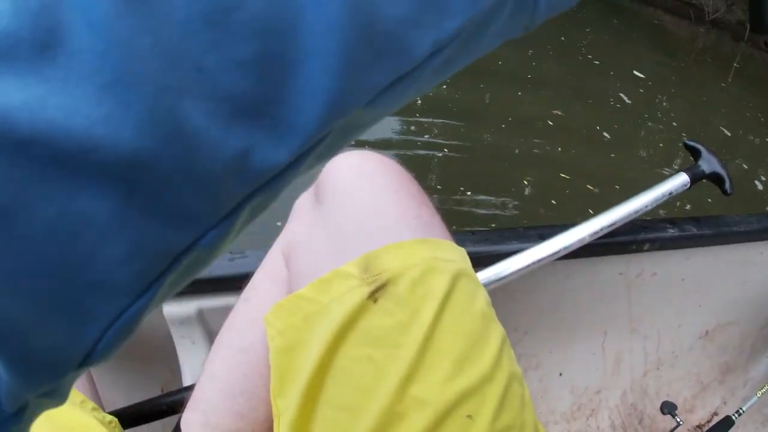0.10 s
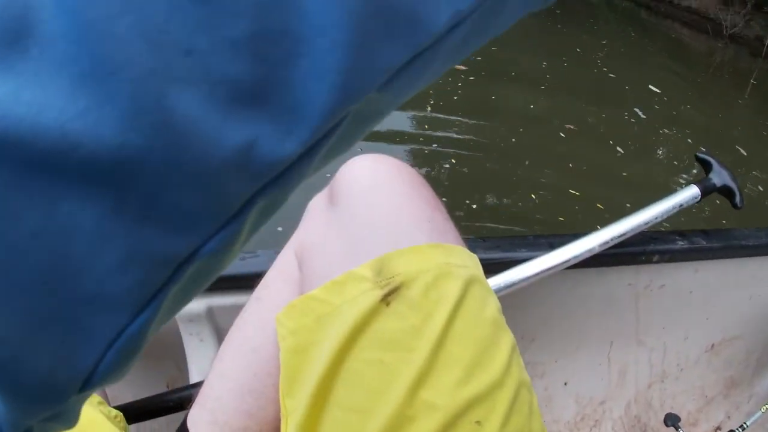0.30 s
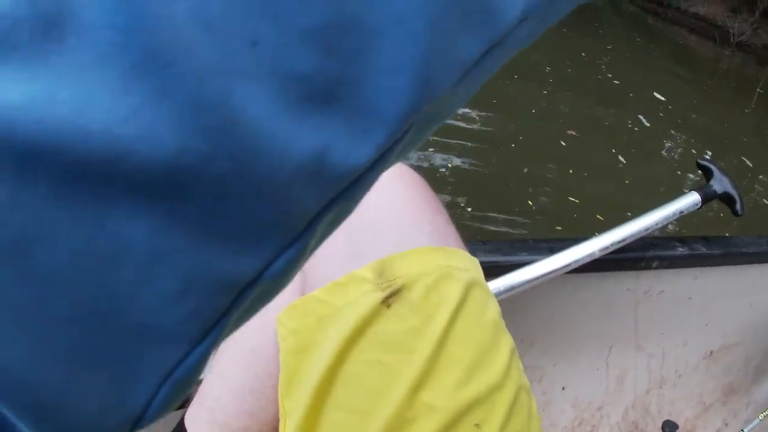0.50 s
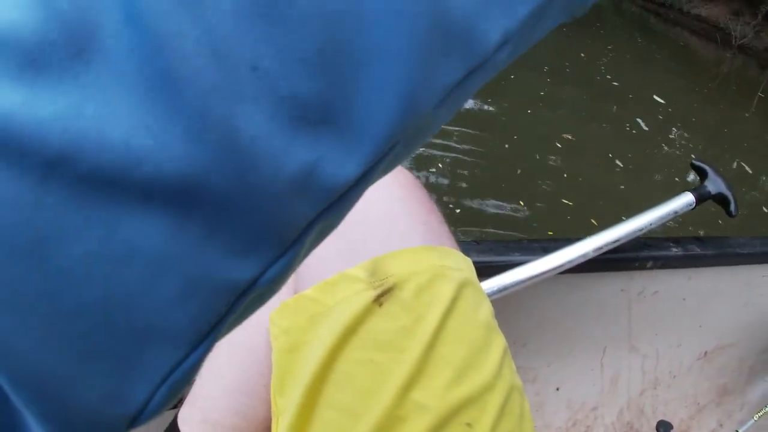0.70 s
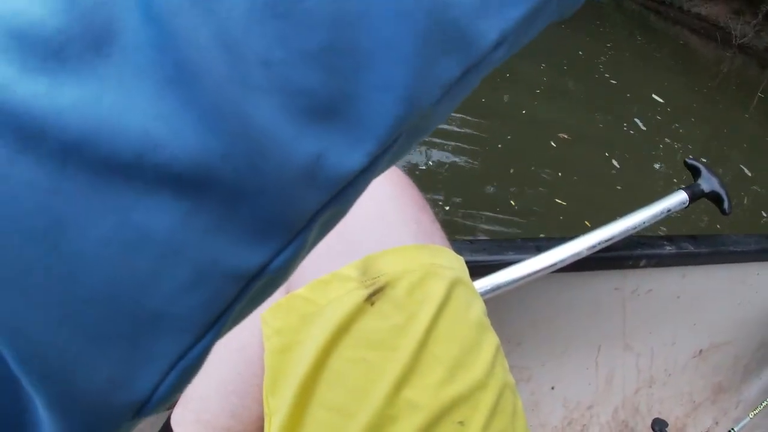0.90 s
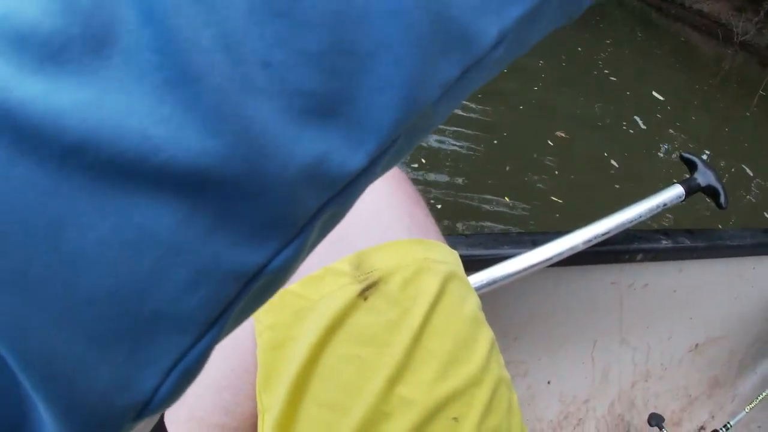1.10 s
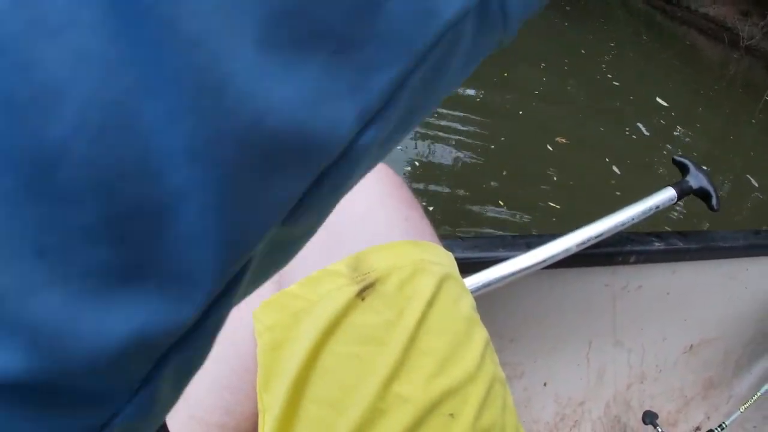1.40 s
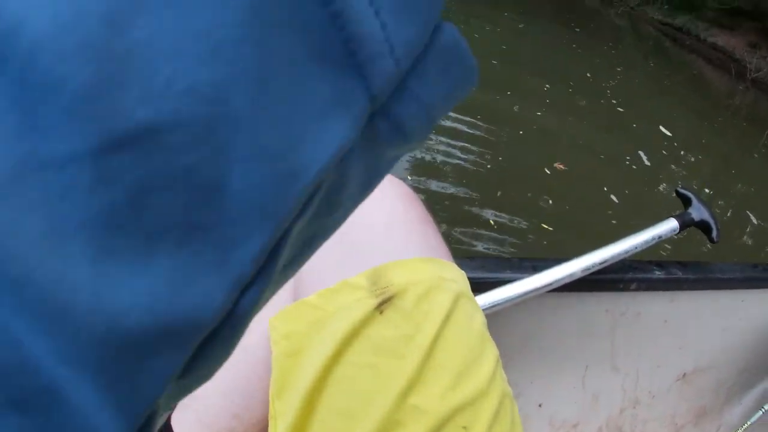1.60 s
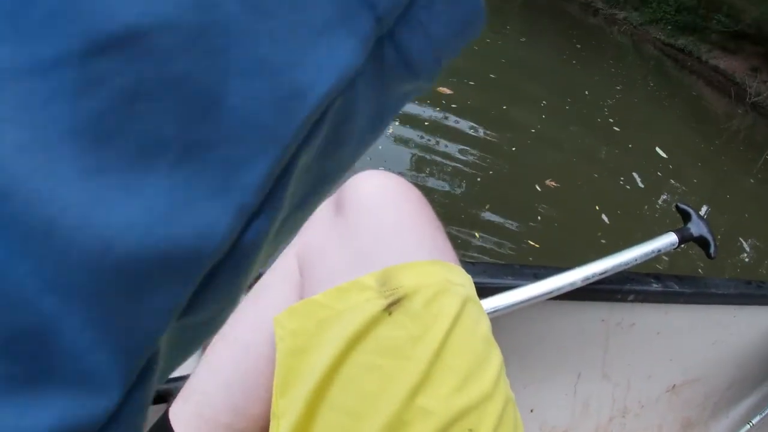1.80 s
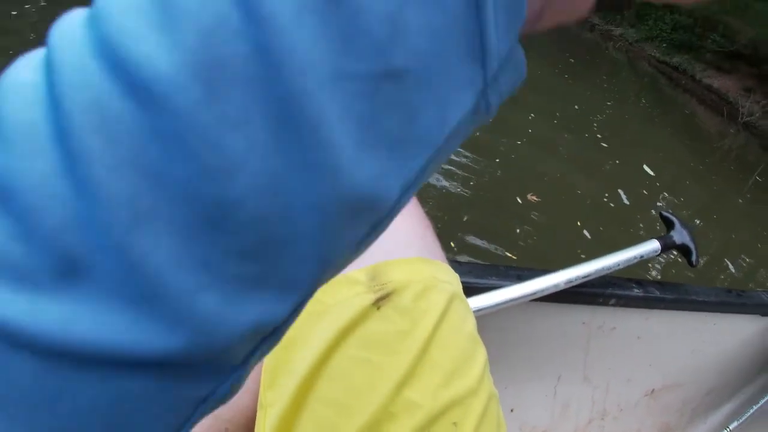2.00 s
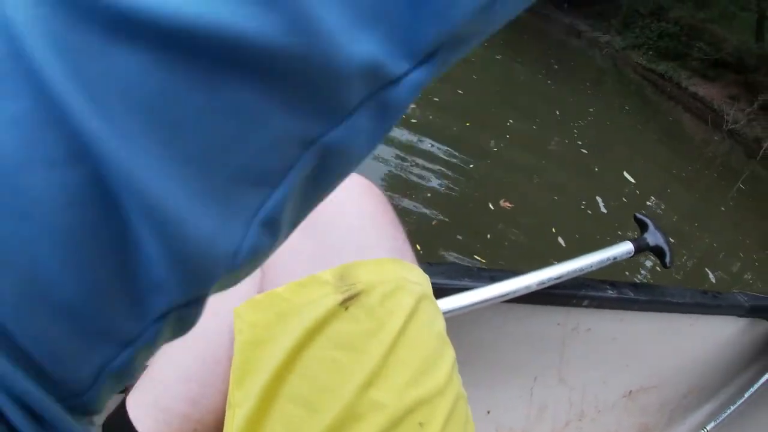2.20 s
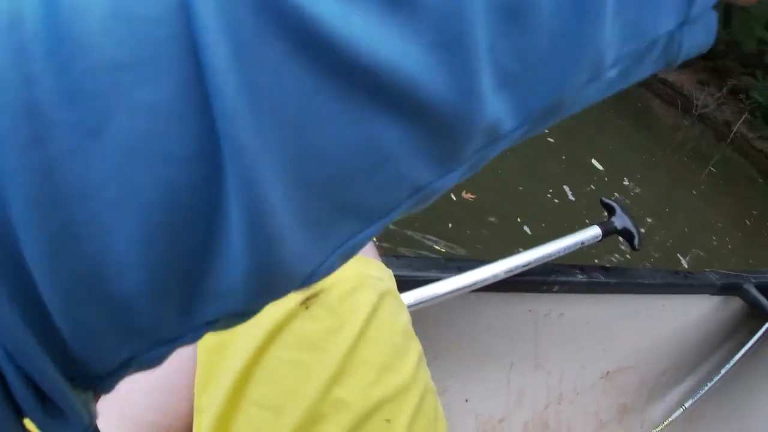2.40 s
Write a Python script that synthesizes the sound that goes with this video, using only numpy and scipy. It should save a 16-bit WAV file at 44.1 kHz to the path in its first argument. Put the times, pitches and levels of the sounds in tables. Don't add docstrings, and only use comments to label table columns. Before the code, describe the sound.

Hollow knocks and dull bumps on a canoe hull, close up, then a fishing reel's sharp ticks in two short turns, a bail snap, and fabric rustling beside the microphone, over steady insect hiss on a creek.

```python
import sys
import numpy as np
from scipy import signal
from scipy.fft import rfft, irfft
from scipy.io import wavfile
from scipy.ndimage import uniform_filter1d

SR = 44100
rng = np.random.default_rng(int(sys.argv[2]) if len(sys.argv) > 2 else 0)


def natural_amplitude(level_db):
    exponent = np.asarray(level_db, float) / 20
    return 10 ** exponent


def persist_wave(psi):
    counts = np.round(np.clip(psi, -1, 1) * 32767).astype(np.int16)
    wavfile.write(sys.argv[1], SR, np.atleast_2d(counts).T)


N = 114660

# (pitch [Hz], level [dB], t60 [s])
BOW_MODES = [(91, -2.5, 0.23), (117.3, 2.5, 0.21), (155.7, 2, 0.42), (260, -8.5, 0.19), (360, -8, 0.19),
             (403, 3, 0.16), (505, 7.5, 0.16), (553, 4, 0.095), (557.6, -0.5, 0.048), (782, 1, 0.14),
             (1093, -5.5, .11), (1200, -4, 0.043), (1394, -15, 0.19)]
RIB_MODES = [(163.3, -6, 0.6), (260, -14, 0.32), (340, -9, 0.25), (480, -11, 0.31), (543, -8, 0.16),
             (730, -17, 0.24), (815, -10, 0.12), (1017, -6, 0.12), (1240, -27, 0.11), (1594, -21, 0.3),
             (1890, -10.5, 0.044)]
SEAT_MODES = [(169.5, 2.5, 0.28), (262.5, -5, 0.3), (391, -6.5, 0.16), (579, -2.5, 0.15), (800, -30, .11),
              (987, -7.5, 0.097), (1620, -12, 0.033)]
KEEL_MODES = [(156.6, -3.5, 0.46), (235.4, -10.5, 0.34), (285.5, -14, 0.43), (373.4, -4.5, 0.35),
              (433.3, -1, 0.22), (508, -13, 0.12), (698, -4, 0.097), (945, -12, 0.04), (1131, -10, 0.08)]
FLOOR_MODES = [(47, 1, 0.71), (89, 4, 0.3), (172, 7, 0.32), (246, 1.5, 0.32), (310.4, 1, 0.39),
               (500, -27, 0.078), (723, -11, 0.066)]
KNOCK_TIMES = [
    .251,
    .408,
    .5105,
    .7805,
    1.524,
]
# (strength [dB], hardness [dB per octave], travel time at 100 Hz [s])
KNOCKS = [(-28, 0.5, 0.037), (-30.5, 1.5, 0.016), (-36, 1.5, 0.026), (-35, 0.5, 0.026),
          (-50.5, -0.5, 0.049)]
BUMP_TIMES = [.2425, .673, .808, .904, .951, .185, .105, .717]
# (strength [dB], hardness [dB per octave], travel time at 100 Hz [s])
BUMPS = [(-28, 4, 0.0072), (-52.5, 4.5, 0.0062), (-37, -3, 0.014), (-48, -2.5, 0.015), (-56.5, -3, 0.013),
         (-63, 2, .01), (-58, -2, 0.011), (-51, -6, 0.0078)]
# (pitch [Hz], level [dB])
SMALL_MODES = [(40, -23.5), (90, -21), (220, -5.5), (400, -7.5), (1200, -14.5), (2300, -21), (4000, -27),
               (7000, -48.5)]
# (time [s], level [dB])
SHUFFLE = [(0, -70), (.09, -66), (.13, -60.5), (.23, -46), (.62, -58), (.66, -60.5), (.7, -47.5),
           (.97, -57), (1.04, -63), (1.4, -72.5), (1.52, -57.5), (1.63, -62), (1.85, -73), (2.08, -63.5),
           (2.25, -68), (2.5, -51)]

# (time [s], peak [dB], ring pitch [Hz], brightness [dB], body pitch [Hz])
PAWL_TICKS = [
    (0.6732, -12, 7350, 3, 2400),
    (0.7317, -14, 7230, 2, 2470),
    (0.7836, -12, 6930, -2, 2340),
    (0.8219, -11.5, 6945, -10, 2250),
    (0.8564, -13.5, 6500, -1.5, 2050),
    (0.887, -13, 7040, -3, 2120),
    (0.9585, -13.5, 6930, 1, 2070),
    (1.0006, -12.5, 6810, 0, 2290),
    (1.0251, -13.5, 6990, 0, 2150),
    (1.0556, -13.5, 6880, 3, 2250),
]
# (share of ring pitch, width [Hz], level [dB])
PAWL_MAIN = [(0.949, 303, -0.5), (1.011, 260, 3), (1.07, 335, -2)]
# (pitch [Hz], width [Hz], level [dB])
PAWL_RING = [(1700, 230, -31), (3280, 260, -22.5), (3900, 350, -18), (4630, 400, -26.5), (5380, 390, -18.5),
             (8910, 310, -11)]
# (pitch [Hz], width [Hz], level [dB])
PAWL_TOP = [(9570, 370, -14.5), (10630, 310, -8), (11960, 340, -12.5), (12570, 660, -13), (13800, 720, -19),
            (15000, 670, -24.5), (16000, 450, -36)]
# (time [s], level [dB])
BAIL_SNAP = [
    (1.2, -31),
    (1.2032, -10),
    (1.2086, -28.5),
]
# (time [s], level [dB])
BAIL_TAPS = [
    (1.125, -35.5),
    (1.138, -35),
    (1.316, -50),
]
# (pitch [Hz], width [Hz], level [dB])
BAIL_RING = [(2084, 286, 2), (3540, 63, -28), (4380, 550, 3.5), (5930, 530, -7.5), (7350, 520, -1.5),
             (9200, 580, -16.5), (11040, 540, -20.5), (12800, 800, -30), (14400, 800, -36)]

# (time [s], sleeve effort [dB], strap rub [dB], seat creak [dB], air on the microphone [dB])
MOVE = [(0, -83, -82, -93, -57), (.3, -70, -102, -103, -59), (1.2, -67.5, -69, -81, -67.5),
        (1.45, -66.5, -95, -66, -78), (1.6, -65, -88, -69.5, -52), (1.73, -67, -59, -55, -60),
        (1.82, -105, -101, -82, -86), (1.97, -83, -77, -63, -64), (2.03, -56, -71, -62, -54),
        (2.13, -56.5, -48.5, -64.5, -51), (2.27, -60, -51.5, -87, -42), (2.335, -53, -66, -44, -48),
        (2.38, -57, -61, -81, -56), (2.47, -55.5, -62, -50, -49), (2.55, -53, -49, -71, -53.5)]
# (pitch [Hz], level [dB])
SLEEVE_COLOUR = [(300, -20.5), (1000, 7.5), (3000, 6.5), (7000, -11.5), (9000, -1), (12000, -23),
                 (15100, -30), (15500, -59)]
# (time [s], level [dB], centre [Hz])
SNAPS = [(1.992, -50, 8000), (1.997, -44.5, 9000), (2.002, -43.5, 8000), (2.007, -50, 10000),
         (2.026, -55, 9000), (2.085, -52, 8000), (2.126, -52, 8000), (2.146, -50, 9000),
         (2.156, -47, 10500), (2.173, -56, 11000), (2.1935, -42, 11000), (2.217, -41.5, 10000),
         (2.2363, -48.5, 9500), (2.302, -43, 9500), (2.329, -49, 11000), (2.362, -51, 10000),
         (2.4074, -62, 13500), (2.451, -67, 9000), (2.512, -66, 11000), (2.527, -54, 12000),
         (2.539, -48.5, 9500), (2.565, -51, 10000)]
# (pitch [Hz], level [dB])
SNAP_COLOUR = [(2000, -13), (5000, 10.5), (9000, 1), (13000, -15), (15200, -21.5), (15700, -45)]
# (time [s], level [dB], pitch [Hz])
PINGS = [
    (2.219, -39, 5050),
    (2.003, -42, 2700),
    (.474, -54, 1950),
]

# (pitch [Hz], level [dB])
CREEK_COLOUR = [(30, -25), (100, -50.5), (160, -4.5), (500, -46), (790, -23.5), (1600, -32), (2600, -12),
                (3700, -9.5)]
# (pitch [Hz], level [dB])
INSECT_COLOUR = [(5300, -12.5), (6300, -5), (6700, -1.5), (7000, 1.5), (7350, -8), (7700, -17),
                 (9000, -27.5), (11000, -35.5), (12500, -48), (15000, -52), (15600, -72)]
# (time [s], level [dB])
BANK_LEVEL = [
    (0.0, -47.5),
    (1.19, -48),
    (2.6, -43.5),
]
# (pitch [Hz], level [dB])
LEFT_LEAN = [(6000, -47), (10500, -24), (11800, -15), (14000, -9.5), (16500, -14)]

SMALL_T60_S, SMALL_SLOPE = 0.33, 0.43
RISE_SHARE = 0.89
CLUSTER_SHARE = 0.0524
SOFT_HZ = 150
BODY_WIDTH_HZ, BODY_DB = 215, -15.5
WANDER_SHARE, WANDER_DB = 0.02, 3.0
SECOND_S, SECOND_DB = 0.0017, -6
BOUNCE_S, BOUNCE_DB = 0.0054, -17.5
CHATTER_DB, CHATTER_T60_S = -22, 0.032
STRAP_HZ, STRAP_WIDTH_HZ = 2330, 330
CREAK_HZ, CREAK_WIDTH_HZ = 1266, 110
AIR_HZ = 43.3
CRINKLES_PER_S, CRINKLE_DB = 270, -7
SNAP_T60_S, SNAP_RISE_S, SNAP_DB, SNAP_OCTAVES = 0.018, 0.0005, 9.5, 0.7
SIDE_DB, EDGE_HZ = -97, 16800


def hull():
    rumble = noise(lambda f: read(SMALL_MODES, f) - 3 * np.log2(1 + f / 300), 3.0, 1.5)
    out = curve(SHUFFLE, col=1) * rumble
    struck = [BOW_MODES, RIB_MODES, SEAT_MODES, KEEL_MODES, FLOOR_MODES] + [KEEL_MODES] * len(BUMPS)
    for s, strike, modes in zip(KNOCK_TIMES + BUMP_TIMES, KNOCKS + BUMPS, struck):
        add(out, s, knock(*strike, modes))
    return out


def knock(db, hard_db, travel, modes):
    t = np.arange(SR // 2)[:, None] / SR
    draw = rng.random((90, 3))
    small = np.geomspace(40, 7000, 90) * (0.97 + 0.06 * draw[:, 0])
    small_level = read(SMALL_MODES, small) + 10 * np.log10(0.05 + draw[:, 1])
    small_t60 = SMALL_T60_S * (100 / small) ** SMALL_SLOPE
    named, named_level, named_t60 = np.repeat(modes, 3, axis=0).T
    offset = np.tile([0, -1, 1], len(modes)) * (0.5 + rng.random(len(named)))
    named = named * (1 + CLUSTER_SHARE * offset)
    named_level = named_level - 4 * rng.random(len(named))

    hz = np.r_[named, small]
    level = np.r_[named_level, small_level] + hard_db * np.log2(np.maximum(hz, SOFT_HZ) / 300)
    t60 = np.r_[named_t60, small_t60]
    lag = abs(travel) * np.sqrt(100 / hz)
    rise = np.clip((t - (1 - RISE_SHARE) * lag) / (RISE_SHARE * lag + 1e-4), 0, 1)
    decay = natural_amplitude(db + level - 60 * np.maximum(t - lag, 0) / t60)
    envelope = np.sin(np.pi / 2 * rise) ** 2 * decay
    phase = np.r_[rng.random(len(named)), draw[:, 2]]
    return (envelope * np.sin(2 * np.pi * (hz * t + phase))).sum(1)


def reel():
    out = np.zeros(N)
    t = np.arange(1500) / SR
    for s, db, hz, bright_db, body_hz in PAWL_TICKS:
        peaks = [(hz * share, w, d) for share, w, d in PAWL_MAIN] + PAWL_RING
        peaks += [(f, w, d + bright_db) for f, w, d in PAWL_TOP]
        peaks += [(body_hz, BODY_WIDTH_HZ, BODY_DB)]
        tick = ring(peaks, 0.00035)
        contacts = rng.standard_normal(1500) * (rng.random(1500) < 0.1)
        chatter = natural_amplitude(CHATTER_DB - 60 * t / CHATTER_T60_S) * contacts
        add(out, s, natural_amplitude(db) * (tick + signal.fftconvolve(chatter, tick)[:1500]))
        second = s + SECOND_S * (0.52 + 0.4 * rng.random())
        add(out, second, natural_amplitude(db + SECOND_DB) * ring(peaks, 0.00034))
        bounce = s + BOUNCE_S * (1 + 0.036 * rng.standard_normal())
        add(out, bounce, natural_amplitude(db + BOUNCE_DB) * ring(peaks, 0.0012))
    for s, db in BAIL_SNAP:
        add(out, s, natural_amplitude(db) * ring(BAIL_RING, 0.00074))
    for s, db in BAIL_TAPS:
        add(out, s, natural_amplitude(db) * ring(BAIL_RING[:1], 0.00072))
    return out


def ring(peaks, rise_s):
    t = np.arange(1500)[:, None] / SR
    hz, width, level = np.transpose(peaks)
    draw = rng.standard_normal((len(hz), 3))
    hz = hz * (1 + WANDER_SHARE * draw[:, 0])
    tone = np.sin(2 * np.pi * (hz * t + draw[:, 2])) * np.exp(-np.pi * width * t)
    onset = 1 - np.exp(-(t / rise_s) ** 2)
    tick = (natural_amplitude(level + WANDER_DB * draw[:, 1]) * tone * onset).sum(1)
    return tick / abs(tick).max()


def sleeve():
    effort = curve(MOVE, col=1)
    fabric = effort * noise(lambda f: read(SLEEVE_COLOUR, f), 1.2, 0.97)
    strap = curve(MOVE, col=2) * band(STRAP_HZ, STRAP_WIDTH_HZ, 3.9)
    creak = curve(MOVE, col=3) * band(CREAK_HZ, CREAK_WIDTH_HZ, 1.1)
    return fabric + strap + creak + crinkles(effort) + snaps() + curve(MOVE, col=4) * air()


def crinkles(effort):
    strength = natural_amplitude(CRINKLE_DB + 3.0 * np.minimum(rng.exponential(1, N), 4))
    kicks = effort * strength * (rng.random(N) < CRINKLES_PER_S / SR)
    decay = natural_amplitude(-60 / (SNAP_T60_S * SR))
    bursts = signal.lfilter([1], [1, -decay], kicks) * rng.standard_normal(N)
    return colour(bursts, lambda f: read(SNAP_COLOUR, f))


def snaps():
    out = np.zeros(N)
    t = np.arange(1024) / SR
    f = np.fft.rfftfreq(1024, 1 / SR) + 1
    for s, db, hz in SNAPS:
        tint = natural_amplitude(read(SNAP_COLOUR, f) - 3.2 * (np.log2(f / hz) / SNAP_OCTAVES) ** 2)
        puff = irfft(rfft(rng.standard_normal(1024)) * tint)
        onset = 1 - np.exp(-(t / SNAP_RISE_S) ** 2)
        add(out, s - SNAP_RISE_S, natural_amplitude(db + SNAP_DB - 60 * t / SNAP_T60_S) * onset * puff)
    for s, db, hz in PINGS:
        add(out, s, natural_amplitude(db) * ring([(hz, 90, 0)], 0.00072))
    return out


def air():
    def tilt(f):
        return -10 * np.log10(1 + (f / AIR_HZ) ** 12) - 40 * (f < 6) - 5 * np.log2(f + 1)
    return evened(colour(rng.standard_normal(N), tilt))


def banks():
    return curve(BANK_LEVEL, col=1) * noise(lambda f: read(CREEK_COLOUR + INSECT_COLOUR, f), 0.56, 0.95)


def noise(db_of, patch_db, throb_db):
    frames, hz = N // 128 + 6, np.fft.rfftfreq(512, 1 / SR)
    real, imag, patch = rng.standard_normal((frames, 257, 3)).T
    patch = uniform_filter1d(patch, size=7, axis=0)
    patch = evened(uniform_filter1d(patch, size=20, axis=1))
    throb = evened(uniform_filter1d(rng.standard_normal(frames), size=3))
    level = db_of(hz)[:, None] + patch_db * patch + throb_db * throb
    spectra = (real + 1j * imag) * natural_amplitude(level)
    return evened(signal.istft(spectra, nperseg=512, noverlap=384)[1][:N])


def band(hz, width_hz, throb_db):
    return noise(lambda f: -20 * np.log10(1 + ((f - hz) / width_hz * 2) ** 2), 3.3, throb_db)


def colour(x, db_of):
    return irfft(rfft(x) * natural_amplitude(db_of(np.fft.rfftfreq(N, 1 / SR))), N)


def read(points, hz):
    f, value = np.transpose(points)
    return np.interp(np.log(hz + 1), np.log(f + 1), value)


def curve(rows, col):
    rows = np.array(rows)
    return natural_amplitude(np.interp(np.arange(N) / SR, rows[:, 0], rows[:, col]))


def evened(x):
    return x / np.sqrt(np.mean(x ** 2) + 1e-20)


def add(mix, s, sound):
    part = mix[round(s * SR):][:len(sound)]
    part += sound[:len(part)]


def scene():
    mono = hull() + reel() + sleeve() + banks()
    return np.tile(mono, (2, 1))


def roll_off(x):
    return signal.sosfilt(signal.butter(12, 16990, fs=SR, output="sos"), x)


def record(dry):
    lean = colour(dry[0], lambda f: read(LEFT_LEAN, f))
    side = lean + natural_amplitude(SIDE_DB) * band(12400, 800, 0.75)
    wide = dry + side * np.array([[1.0], [-1.0]])
    lowpass = signal.firwin(255, EDGE_HZ, window=("kaiser", 9), fs=SR)
    mix = signal.oaconvolve(wide, lowpass[None], "same")
    return roll_off(mix)


dry = scene()
out = record(dry)
persist_wave(out)
```